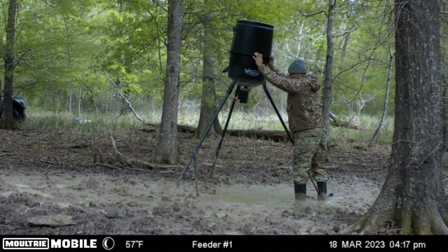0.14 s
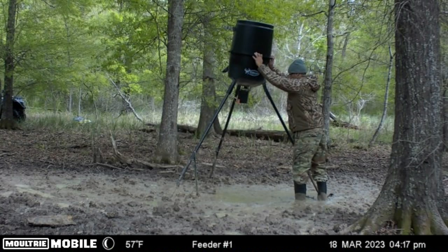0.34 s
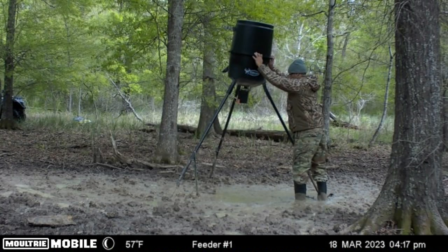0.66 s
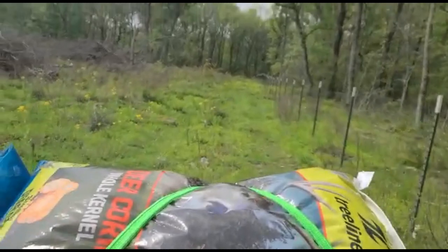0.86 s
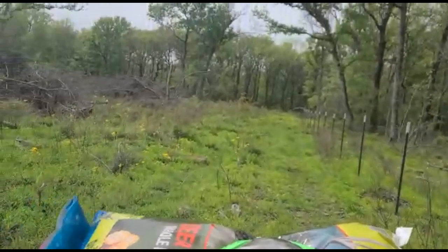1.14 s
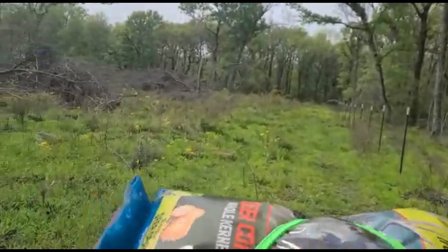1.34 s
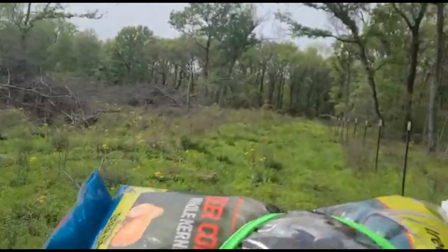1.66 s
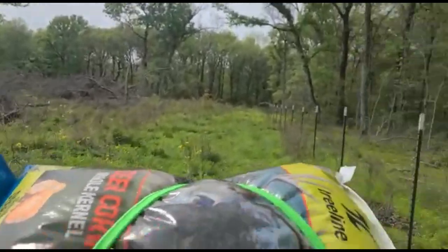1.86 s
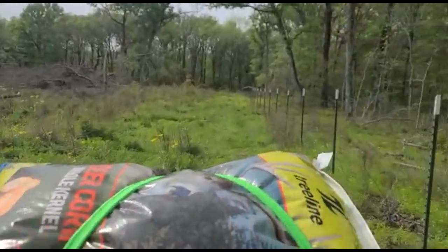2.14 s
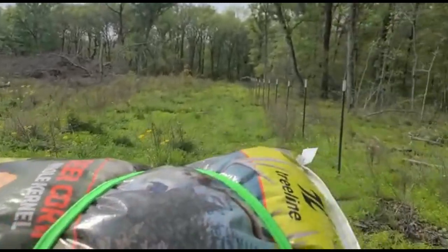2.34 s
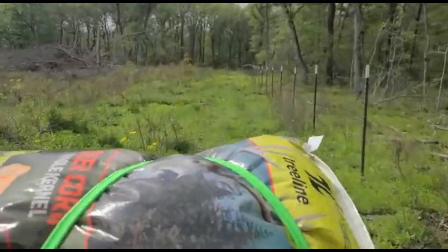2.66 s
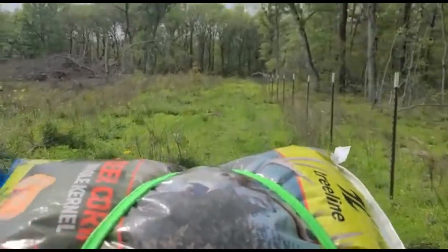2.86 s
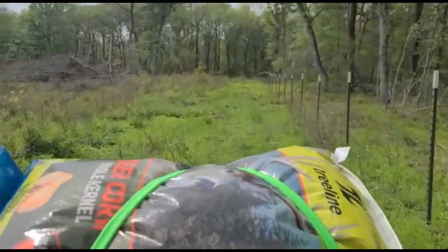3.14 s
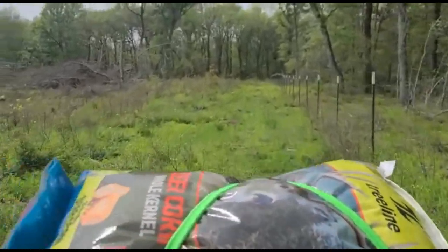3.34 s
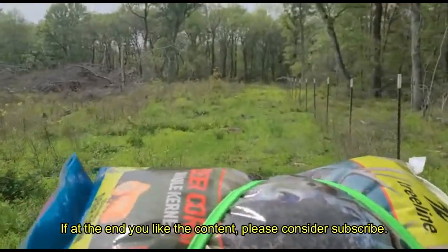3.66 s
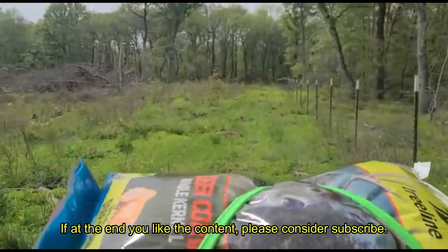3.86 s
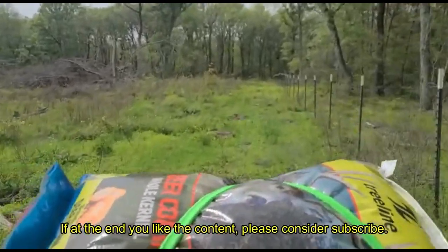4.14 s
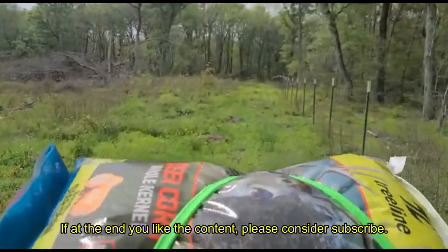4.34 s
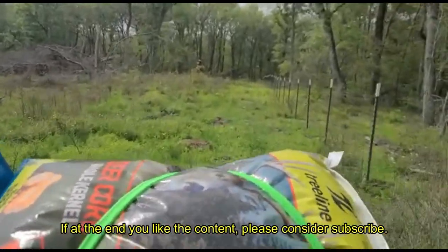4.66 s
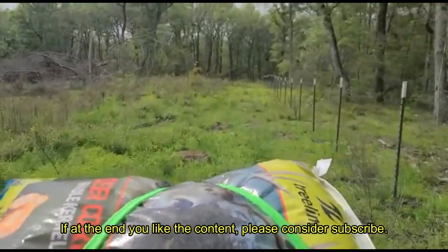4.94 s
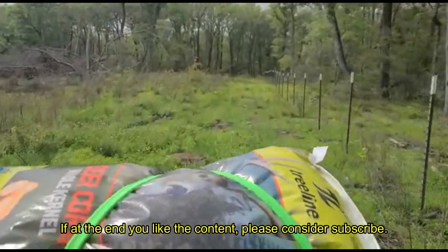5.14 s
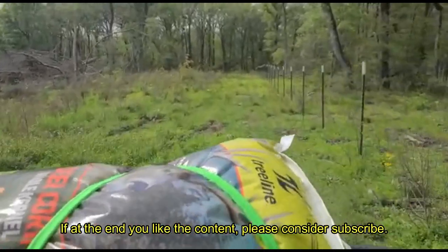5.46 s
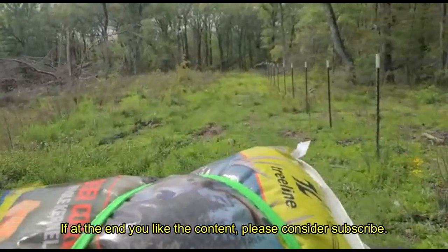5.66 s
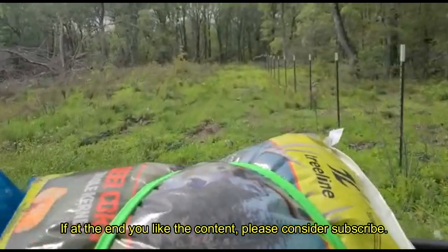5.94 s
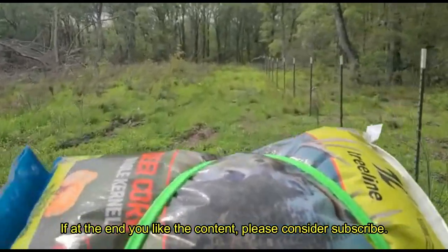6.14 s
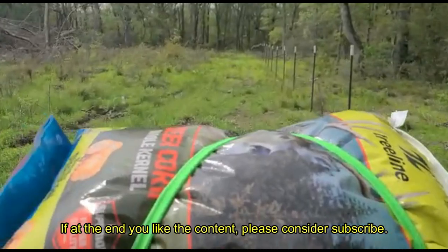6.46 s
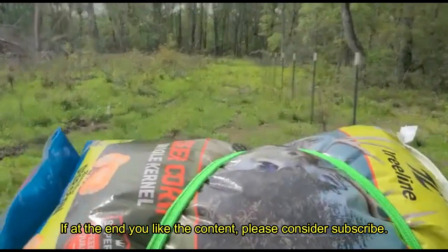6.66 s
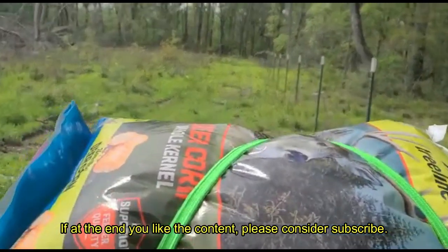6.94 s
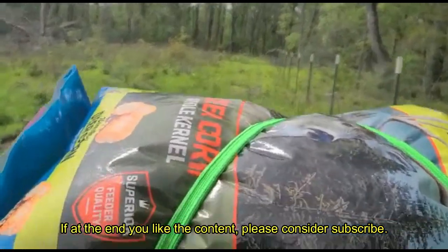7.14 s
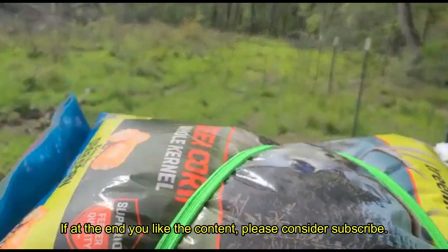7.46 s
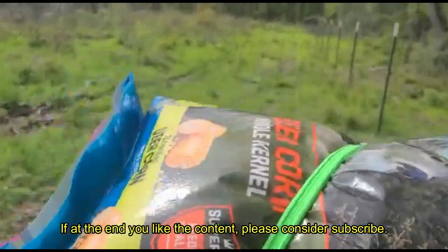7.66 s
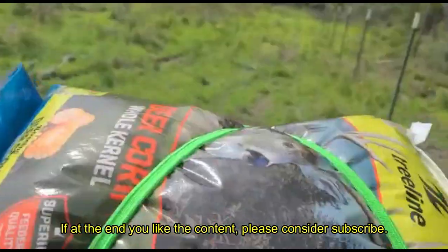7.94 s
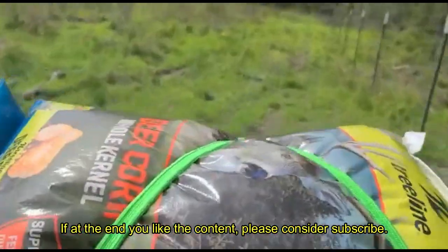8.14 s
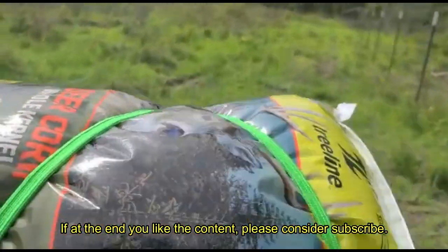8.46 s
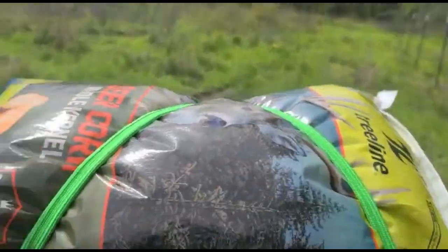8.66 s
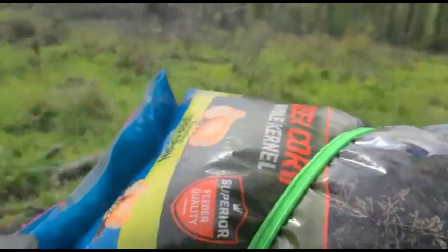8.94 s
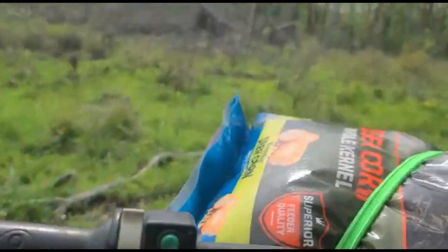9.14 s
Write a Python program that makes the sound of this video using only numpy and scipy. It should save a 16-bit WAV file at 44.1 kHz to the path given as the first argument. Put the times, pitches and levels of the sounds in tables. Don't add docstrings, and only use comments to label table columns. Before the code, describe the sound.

After a short silence, a small two-cylinder off-road engine cuts in abruptly and throbs steadily at close range, with clatter, gear whine and faint ticks.

```python
import sys
import numpy as np
from scipy import signal
from scipy.io import wavfile
from scipy.ndimage import uniform_filter1d

SR = 44100
rng = np.random.default_rng(int(sys.argv[2]) if len(sys.argv) > 2 else 0)


def invert_db(level):
    return 10 ** (np.asarray(level, dtype=float) / 20)


def waveform_to_disk(signal):
    frames = np.transpose(np.atleast_2d(signal))
    scaled = np.clip(frames, -1, 1) * 32767
    samples = np.round(scaled).astype(np.int16)
    wavfile.write(sys.argv[1], SR, samples)


N = 410571

# (time [s], engine cycles [Hz], firing tone level [dB])
ENGINE_SPEED = [(0.8, 36.925, -30.0), (1.75, 37.502, -27.5), (1.85, 36.781, -27.0), (2.6, 36.913, -28.5),
                (2.7, 37.382, -28.5), (3.25, 36.968, -28.0), (3.35, 37.329, -28.0), (4.45, 37.633, -28.5),
                (4.7, 36.834, -28.5), (5.1, 37.642, -27.5), (5.8, 37.104, -27.5), (5.9, 37.416, -28.0),
                (7.25, 36.885, -28.0), (7.35, 35.878, -29.0), (7.7, 37.588, -29.0), (8.05, 36.939, -28.0),
                (8.8, 37.19, -27.0), (9.3, 36.227, -28.5)]
# (multiple of the engine cycle [count], level [dB])
EXHAUST_TONES = [(1, -7.5), (2, 0.5), (3, -16.5), (4, -1.5), (5, -28), (6, -4), (7, -17.5), (8, -5),
                 (9, -16.5), (10, -4.5), (11, -17.5), (12, -15.5), (13, -26.5), (14, -28.5), (15, -26),
                 (16, -19.5), (17, -24), (18, -23), (19, -28.5), (20, -27)]
# (frequency [Hz], level [dB per Hz])
RUMBLE_COLOUR = [(25, -34), (55, -16), (90, -5), (130, -9), (190, -1), (240, 0), (300, -3), (420, -5),
                 (520, -10), (650, -10), (850, -13), (1300, -40), (2500, -100)]
# (frequency [Hz], level [dB per Hz])
CLATTER_COLOUR = [(410, -2.5), (700, -17), (1020, 2.5), (1230, 2), (1390, -2), (1530, 1), (1780, -3),
                  (2340, -17), (2870, -26), (3600, -27), (4680, -72.5), (7920, -120)]
# (frequency [Hz], level [dB per Hz])
HISS_COLOUR = [(1060, -29), (1800, -3.5), (2460, -8.5), (2870, -6), (3030, -8), (3810, -17), (5150, -22.5),
               (5390, -29), (6360, -35.5), (6840, -42.5), (8830, -32), (11600, -26.5), (12700, -27.5),
               (15100, -28.5), (16000, -32)]
# (frequency [Hz], width [Hz], level [dB])
PANEL_RINGS = [(1340, 47, -13)]
# (multiple of the engine cycle [count], level [dB])
GEAR_WHINES = [(70, -7), (72, -9), (74, -3), (75, -1), (76, -2), (77, -3), (84, -10), (135, -17)]
# (frequency [Hz], likeness [0-1])
SIDE_LIKENESS = [(60, 1), (160, .95), (270, .88), (450, .6), (740, .4), (1300, .42), (2200, .36),
                 (3500, .12), (9000, .05)]
# (frequency [Hz], left minus right [dB])
SIDE_LEAN = [(60, 0), (160, .3), (270, -.5), (450, -2), (740, -4.5), (1220, -6), (2010, -7.5), (3330, -9.3),
             (9080, -11), (15000, -8.5)]
# (frequency [Hz], lead [s])
RIGHT_LEAD = [(30, .0002), (100, .0002), (150, .0004), (400, .0004), (1000, .0003), (1400, .00007),
              (16000, .0001)]
# (time [s], peak level [dB], bass share [dB], time to fade 60 dB [s])
LOAD_TICKS = [(1.6197, -53, -13, 0.027), (2.1966, -54, -9, 0.035), (2.2048, -30.5, -15, 0.02),
              (2.2235, -47, -20, 0.03), (2.277, -41, -25, 0.045), (5.5994, -53, -12, 0.033),
              (7.33, -51, -5, 0.025), (7.4993, -57, -11.5, 0.04), (7.6914, -44, -15, 0.032),
              (7.7104, -50.5, -14, 0.032), (7.7444, -56, -17, 0.032), (7.755, -42, -15, 0.034),
              (7.9488, -47, -7, 0.04), (8.0024, -51, -14, 0.034), (8.0294, -53, -13, 0.033)]
# (frequency [Hz], width [Hz], level [dB])
TICK_LOW_RINGS = [(1850, 130, 41), (790, 60, 32), (5300, 300, 14), (4200, 900, 3)]
# (frequency [Hz], width [Hz], level [dB])
TICK_HIGH_RINGS = [(8900, 340, -10), (11500, 2300, 0), (14300, 1400, -6)]
# (time [s], length [s], squeak frequency [Hz], squeak level [dB], scrape level [dB])
PLASTIC_RUBS = [
    (.79, 0.054, 12200, -63, -89),
    (4.228, 0.054, 9400, -62, -54),
    (8.49, .05, 14000, -64, -94),
    (7.57, .03, 10500, -66, -94),
]
# (frequency [Hz], width [Hz], level [dB])
CASE_RINGS = [(1399.6, 72, 0.5), (1063, 44, -13), (1360, 340, -11.5), (959, 64, -5), (1653, 150, -8.5),
              (823, 39, -9.5), (1139, 50, -10)]
# (time [s], camera turned from the pipe [0-1], ground roughness [0-1], tailpipe in view [0-1])
RIDE_VIEW = [(.8, 0.5, 0.42, 0.5), (1.1, 0.2, 0.33, 0.6), (1.5, 0.3, 0.17, 0.57), (1.9, 0.26, 0.43, 0.28),
             (2.6, 0.24, 0.48, 0.65), (3.1, .3, 0.38, 0.64), (4.0, 0, 0.1, 0.68), (4.3, 0.1, 0.4, 0.9),
             (4.8, 0.1, .4, 0.5), (5.6, .05, 0.47, 0.49), (6.3, 0.25, 0.54, 0.55), (6.9, 0.3, 0.42, 0.44),
             (7.25, 0.6, 0.5, 0.83), (7.45, 0.68, 0.42, 0.42), (8.0, 0.5, 0.24, 0.7),
             (8.6, 0.76, 0.4, 0.17), (8.9, 0.36, 0.2, 0.36), (9.3, 0, 0, 0.2)]
# (time [s], length [s], added rumble [dB], low pipe tones choked by [dB])
RUTS = [(1.02, 0.038, 5, -1.5), (1.51, 0.036, 1.5, 0), (1.855, 0.14, 1.5, 5), (2.203, 0.037, 3, 2),
        (2.61, 0.039, 1, 3), (3.23, 0.062, 2, 4), (3.71, 0.048, 3.5, 0), (4.237, 0.064, 4, 2.5),
        (4.647, 0.24, 2, -3), (5.15, 0.076, 1, 3), (5.395, .05, 5, 0), (5.578, 0.042, 4.5, 5),
        (5.685, 0.018, 5.5, -3), (5.735, 0.038, 0.5, 9), (5.86, 0.046, 3, -3), (6.036, 0.046, 5, 3),
        (6.25, 0.059, 6, -1), (7.337, 0.044, 3.5, 14.5), (7.812, 0.032, 0, -7), (8.45, 0.056, 1.5, 0),
        (8.91, 0.11, -0.5, 6)]
# (start time [s], length [s], whine gain [dB])
GEAR_PULLS = [
    (.78, 0.23, 13),
    (1.4, .2, 10),
    (1.95, 0.47, 9),
    (2.7, .3, 8),
    (3.4, 1.43, 12),
    (5.2, .4, 9),
    (6.15, 1.5, 10),
    (7.85, .1, 4),
    (8.9, .3, 12.5),
]


def evened(x):
    return x / np.sqrt(np.mean(x ** 2) + 1e-20)


def read(points, hz):
    f, value = np.transpose(points)
    return np.interp(np.log(hz + 1), np.log(f + 1), value)


def curves(table):
    s, *columns = np.transpose(table)
    return [np.interp(np.arange(N) / SR, s, c) for c in columns]


def add(mix, s, sound):
    part = mix[:, round(s * SR):][:, :sound.shape[1]]
    part += sound[:, :part.shape[1]]


def resonate(x, hz, width):
    turn = np.exp(2j * np.pi * np.cumsum(hz * np.ones(x.shape[-1])) / SR)
    r = np.exp(-np.pi * width / SR)
    return 2 * (turn * signal.lfilter([1 - r], [1, -r], x / turn)).real


def wander(hz):
    knots = rng.standard_normal(400)
    coarse = np.arange(0, N, 64)
    smooth = uniform_filter1d(np.interp(coarse / SR * hz, np.arange(400), knots), size=9)
    return np.interp(np.arange(N), coarse, evened(smooth))


def jolts(column):
    t = np.arange(0, N, 64) / SR
    bells = sum(row[column] * np.exp(-((t - row[0]) / row[1]) ** 2) for row in RUTS)
    return np.interp(np.arange(N) / SR, t, bells)


def burst(cycles, at, decay, uneven_db):
    since = cycles - at + 1
    strength = invert_db(uneven_db * rng.standard_normal(500))[since.astype(int)]
    return uniform_filter1d(strength * np.exp(-(since % 1) / decay), size=90)


def stroke(cycles, at, share):
    return uniform_filter1d(1. * ((cycles - at) % 1 < share), size=120)


def noise(colour, patchy_db):
    hz = np.fft.rfftfreq(1024, 1 / SR)
    a, b, c, d, patches = rng.standard_normal((N // 256 + 5, 513, 5)).T
    patches = uniform_filter1d(patches, size=8, axis=0)
    patches = evened(uniform_filter1d(patches, size=14, axis=1))
    same = np.clip(read(SIDE_LIKENESS, hz), 0, 1)[:, None]
    lead = np.exp(2j * np.pi * hz * read(RIGHT_LEAD, hz))[:, None]
    left = a + 1j * b
    right = same * left * lead + np.sqrt(1 - same ** 2) * (c + 1j * d)
    lean_db = read(SIDE_LEAN, hz)[:, None] / 2
    z = np.array([left * invert_db(lean_db), right * invert_db(-lean_db)])
    z = z * invert_db(read(colour, hz)[:, None] + patchy_db * patches)
    return evened(signal.istft(z, nperseg=1024, noverlap=768)[1][:, :N])


def ticks(out):
    t = np.arange(3000) / SR
    side = invert_db([[-6.0], [5.5]])
    for s, db, bass_db, t60 in LOAD_TICKS:
        snap = rng.standard_normal((2, 3000)) * invert_db(-60 * t / t60)
        top = sum(invert_db(d) * resonate(snap, f, w) for f, w, d in TICK_HIGH_RINGS)
        body = sum(invert_db(d + bass_db) * resonate(snap, f, w) for f, w, d in TICK_LOW_RINGS)
        add(out, s, invert_db(db - 4.5) * side * (top + body) * np.minimum(t / 0.0011, 1))


def rubs(out):
    side = invert_db([[-9.0], [5.0]])
    for s, length, hz, squeak_db, scrape_db in PLASTIC_RUBS:
        grit = rng.standard_normal((2, 4000))[:, :round(length * SR)]
        squeak = evened(resonate(resonate(grit, hz, 320), hz, 320))
        scrape = evened(resonate(resonate(grit[::-1], 4300, 4500), 4300, 4500))
        rub = invert_db(squeak_db) * squeak + invert_db(scrape_db) * scrape
        add(out, s, side * rub * np.hanning(grit.shape[1]))


def load():
    out = np.zeros((2, N))
    ticks(out)
    rubs(out)
    return out


def gears(shaft):
    t = np.arange(N) / SR
    edge_s = .12
    pull_db = 0
    for s, length, db in GEAR_PULLS:
        inside = np.minimum(t - s, s + length - t)
        pull_db = pull_db + db * np.clip(inside / edge_s + .5, 0, 1)
    whine = np.zeros(N)
    for k, db in GEAR_WHINES:
        turn = 2 * np.pi * k * shaft + .4 * wander(14.0) + 2.5 * wander(4.0)
        whine += invert_db(db + 2.0 * wander(1.5)) * np.cos(turn)
    return invert_db(-74 + 1.08 * pull_db) * whine * invert_db([[-4.0], [4.0]])


def hiss(cycles):
    swell = .36 * stroke(cycles, at=.83, share=.48)
    puff = .2 * burst(cycles, at=.81, decay=.3, uneven_db=4.0)
    rush = noise(HISS_COLOUR, patchy_db=1.5) * (1 + swell + puff)
    return invert_db(-49.5 + .5 * wander(6.0)) * evened(rush)


def knock(cycles):
    blow_cycles = np.arange(800) / 2 + .81 + .002 * rng.standard_normal(800)
    at = np.searchsorted(cycles, blow_cycles)
    blow_db = np.where(np.arange(800) % 2, -11.0, 0)
    ring = np.zeros(N)
    for f, w, db in CASE_RINGS:
        blows = np.zeros(N + 1)
        blows[at] = invert_db(blow_db + 2.6 * rng.standard_normal(800))
        soft = uniform_filter1d(uniform_filter1d(blows[:N], size=13), size=13)
        ring = ring + invert_db(db) * evened(resonate(resonate(soft, f, 2.5 * w), f, w))
    return evened(np.array([invert_db(-5.5) * np.roll(ring, shift=6), ring]))


def clatter(cycles):
    rattle = noise(CLATTER_COLOUR, patchy_db=-0.5)
    rattle = rattle + sum(invert_db(db) * evened(resonate(rattle, f, w)) for f, w, db in PANEL_RINGS)
    rattle = evened(rattle * (.95 + burst(cycles, at=.78, decay=.3, uneven_db=1.2)))
    return invert_db(-41.5 + 0.62 * wander(9.0)) * (rattle + invert_db(-4.0) * knock(cycles))


def rumble(cycles, rough):
    roar = noise(RUMBLE_COLOUR, patchy_db=0.8)
    roar = roar * (1.0 + burst(cycles, at=0.42, decay=0.047, uneven_db=2.0))
    level_db = -36.5 + 6 * rough + jolts(column=2) + 0.82 * wander(12.0)
    return invert_db(level_db) * evened(roar)


def exhaust(cycles, hz, turned, view):
    uneven_db = -6.5 + 21 * turned + 1.8 * wander(6.0)
    low_db = 2.2 - jolts(column=3) + 1.3 * wander(7.0)
    high_db = 8.5 * view - 4.0 + 0.78 * wander(8.0)
    out, jitter = np.zeros((2, N)), wander(14.0)
    for k, db in EXHAUST_TONES:
        if k % 2:
            swing_db = uneven_db * np.exp(-((k - 9) / 2.5) ** 2)
        else:
            near_low = np.exp(-((k - 6) / 1.6) ** 2)
            near_high = np.exp(-((k - 10) / 2.5) ** 2)
            swing_db = near_low * low_db + near_high * high_db
        waver_db = (.3 + .07 * k + .2 * max(k - 11, 0)) * wander(11.0)
        level = invert_db(db + swing_db + waver_db)
        spread = min(k, 10)
        pipe_turn = -1.815 * spread + .5 * spread ** 2 + 1.53 + .4 * (k - spread)
        turn = 2 * np.pi * k * cycles + pipe_turn
        turn = turn + k * (.012 * jitter + .008 * wander(16.0))
        centre = k * hz.mean()
        lean_db = read(SIDE_LEAN, centre) / 2
        lead = 2 * np.pi * centre * read(RIGHT_LEAD, centre)
        out[0] += invert_db(lean_db) * level * np.cos(turn)
        out[1] += invert_db(-lean_db) * level * np.cos(turn + lead)
    return np.sqrt(2) * out


def engine():
    hz, fire_db = curves(ENGINE_SPEED)
    turned, rough, view = curves(RIDE_VIEW)
    shaft = np.cumsum(hz) / SR - .479
    cycles = np.maximum(shaft + .008 * wander(5.0), 0)
    tones = invert_db(fire_db - 0.5 + 0.72 * wander(11.0)) * exhaust(cycles, hz, turned, view)
    return gears(shaft) + hiss(cycles) + clatter(cycles) + rumble(cycles, rough) + tones


def scene():
    return load() + engine()


def thin_treble(x, share):
    padded = np.pad(x, ((0, 0), (0, 2048)), "reflect")
    z = signal.stft(padded, nperseg=1024, noverlap=512)[2]
    bands = z[:, :512].reshape(2, 64, 8, -1)
    power = uniform_filter1d((abs(bands) ** 2).mean(2), size=2, axis=2)
    power_db = 10 * np.log10(power + 1e-20)
    power_db = power_db + 4.0 * rng.standard_normal(power_db.shape)
    limit_db = np.quantile(power_db[:, 12:46, 80:], share)
    keep = np.where(power_db < limit_db, .03, 1)[:, :, None]
    z = np.concatenate([(bands * keep).reshape(2, 512, -1), z[:, 512:]], axis=1)
    return signal.istft(z, nperseg=1024, noverlap=512)[1][:, :N]


def top_cut(x):
    return signal.sosfilt(signal.butter(12, 15770, fs=SR, output="sos"), x)


def record(dry):
    start_s, end_fade_s = .7772, .003
    t = np.arange(N) / SR
    heard = thin_treble(dry, share=.19) * (t >= start_s)
    mix = heard * np.minimum((t[-1] - t) / end_fade_s, 1)
    return top_cut(mix)


dry = scene()
out = record(dry)
waveform_to_disk(out)
```